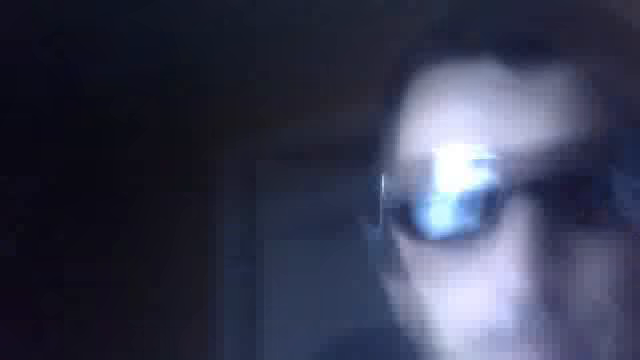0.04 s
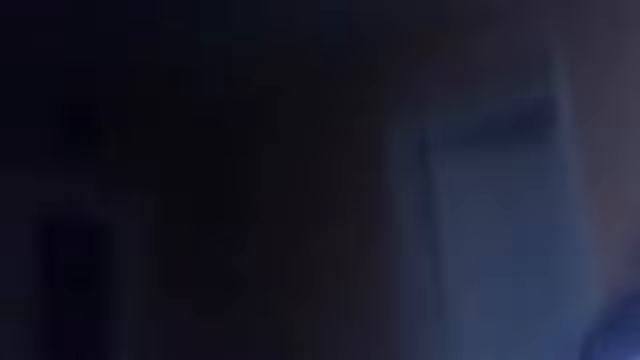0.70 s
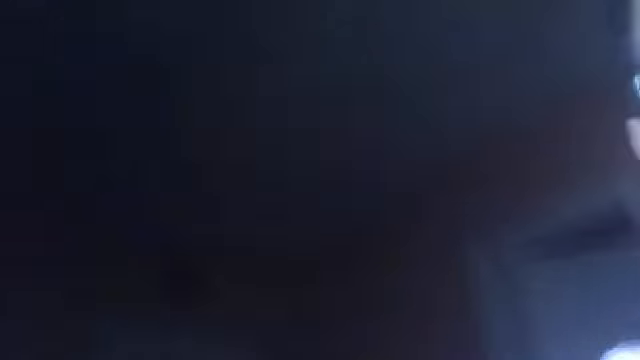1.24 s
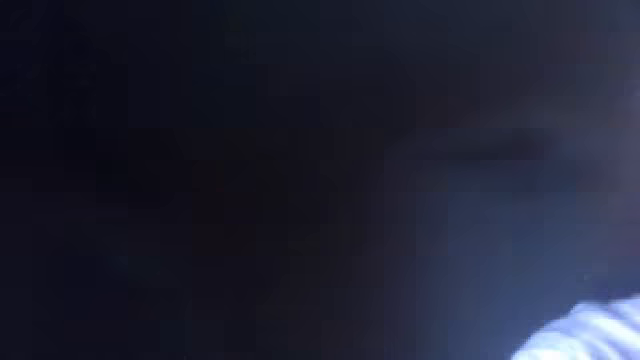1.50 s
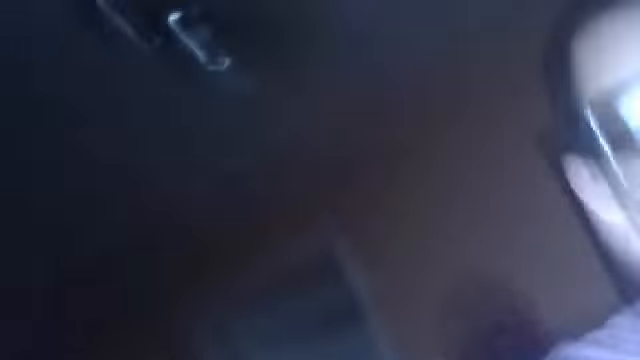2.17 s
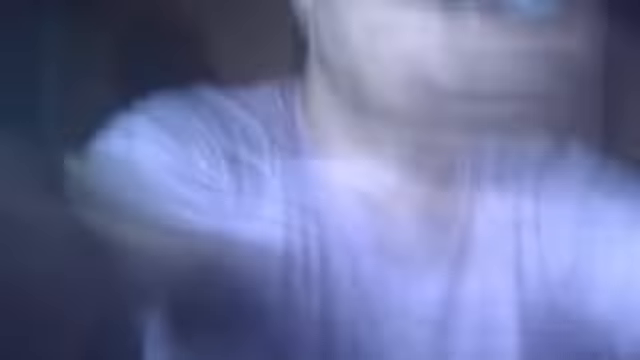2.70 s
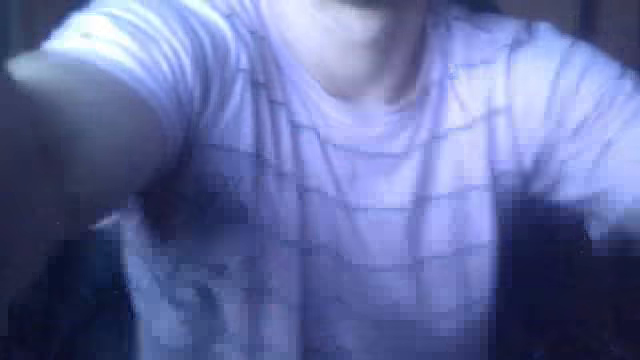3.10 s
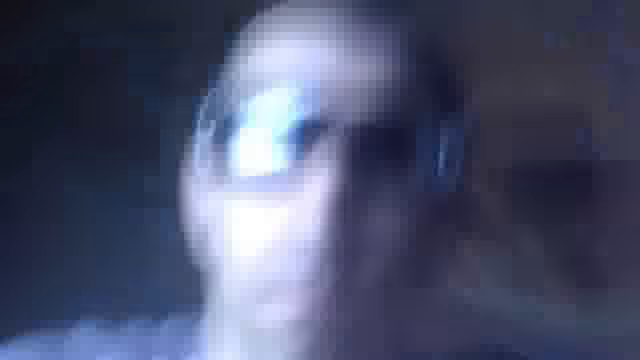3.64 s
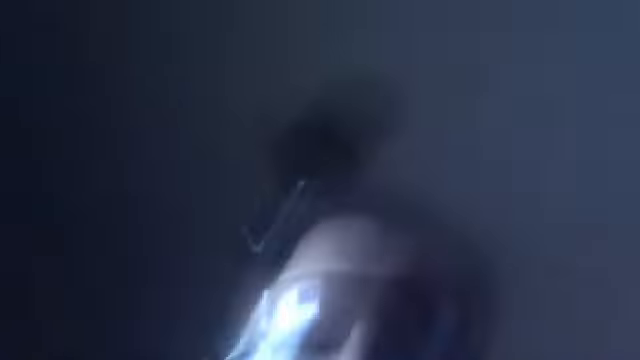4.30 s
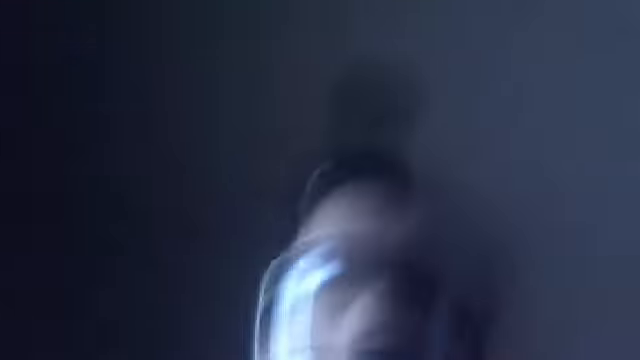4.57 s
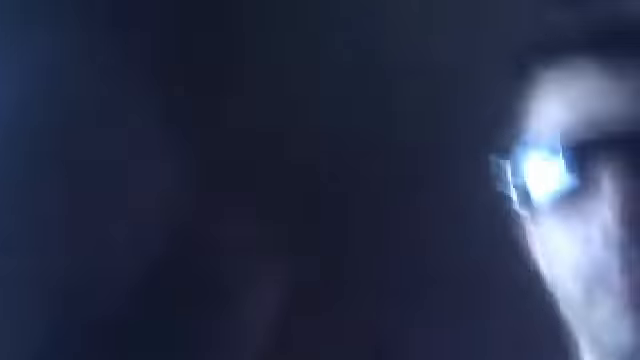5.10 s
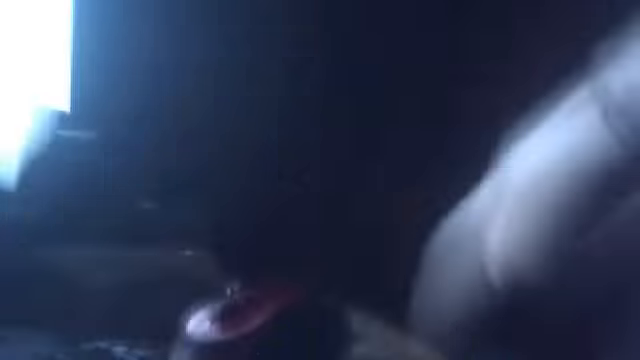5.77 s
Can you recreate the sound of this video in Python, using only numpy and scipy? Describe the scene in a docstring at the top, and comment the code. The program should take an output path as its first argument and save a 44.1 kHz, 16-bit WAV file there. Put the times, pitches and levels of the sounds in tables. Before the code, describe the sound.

A small plastic webcam is handled, with knocks, clicks, rubbing and low rumble on its own microphone over a steady hum.

```python
"""In a quiet room, a small plastic webcam is picked up and turned about, heard through its own microphone.
The hand shakes it with a low rumble, and stick-slip friction makes the skin rub, scuff and squeak.
Finger blows set the camera bouncing on its mount, a damped spring, and ring the thin shell in short ticks.
Mains hum and hiss lie underneath, and the hardest blows overload the input."""
import sys
import numpy as np
from scipy import signal
from scipy.fft import rfft, irfft, next_fast_len
from scipy.io import wavfile
from scipy.ndimage import uniform_filter1d, map_coordinates

SR = 44100
rng = np.random.default_rng(int(sys.argv[2]) if len(sys.argv) > 2 else 0)


def log_audio(samples):
    """Write samples as a 16-bit WAV file to the path given in sys.argv[1]."""
    # one column per channel
    frames = np.atleast_2d(samples).T
    # limit to full scale, then quantise
    limited = np.clip(frames, -1, 1)
    pcm = np.round(limited * 32767).astype(np.int16)
    wavfile.write(sys.argv[1], SR, pcm)


N = 263718


def amp(db):
    """Decibels as an amplitude ratio."""
    return 10 ** (np.asarray(db) / 20)


def unit(x):
    """Normalisation to an rms of 1."""
    return x / np.sqrt(np.mean(x ** 2) + 1e-20)


def wobble(rate):
    """Smooth random modulation: a spline through `rate` knots a second."""
    knots = rng.standard_normal(int(N * rate / SR) + 4)
    return map_coordinates(knots, [np.arange(N) * rate / SR])


def filtered(x, response):
    """Linear filtering: the spectrum of x times a complex frequency response."""
    size = next_fast_len(len(x) + SR // 4)
    return irfft(rfft(x, size) * response(np.fft.rfftfreq(size, 1 / SR)), size)[:len(x)]


def coloured(x, spectrum):
    """Spectral shaping by (Hz, dB) points joined on a logarithmic frequency axis."""
    hz, db = np.transpose(spectrum)
    return filtered(x, lambda f: amp(np.interp(np.log(f + 1), np.log(hz + 1), db)))


def add(track, start_s, sound):
    """Superposition of a sound on the track."""
    part = track[round(start_s * SR):][:len(sound)]
    part += sound[:len(part)]


def friction(spectrum, rate, grain_db, flutter_db, patchy_db):
    """Stick-slip friction: `rate` releases a second over hiss; the colour shifts as the contact moves."""
    releases = (rng.random(N) < rate / SR) * rng.standard_normal(N)
    grainy_hiss = rng.standard_normal(N) + amp(grain_db) * unit(releases)
    frames = signal.stft(grainy_hiss, nperseg=1024)[2]
    patches = uniform_filter1d(rng.standard_normal(frames.shape), size=5, axis=0)
    patches = uniform_filter1d(patches, size=5, axis=1)
    force = signal.istft(frames * amp(patchy_db * unit(patches)), nperseg=1024)[1][:N]
    return unit(coloured(force, spectrum) * amp(flutter_db * wobble(70)))


# The noise floor. Each row: frequency in Hz, relative spectral density in dB.
ROOM_SPECTRUM = [(60, -6), (200, -10), (290, -12.5), (370, -1.5), (550, -10.5), (950, -12.5), (1200, -16),
                 (1650, -16.5), (2100, -19), (2650, -19), (3300, -22), (4700, -24), (6000, -44)]

def room(level_db=-56):
    """Stationary noise: the quiet room and the microphone's own hiss."""
    return amp(level_db) * unit(coloured(rng.standard_normal(N), ROOM_SPECTRUM))


# The mains lines. Each row: frequency in Hz, rms level in dB.
HUM_LINES = [(49.8, -33.5), (199.2, -61)]

def hum():
    """Mains pick-up: steady sinusoids at the supply frequency and its fourth harmonic."""
    t = np.arange(N) / SR
    return sum(np.sqrt(2) * amp(db) * np.sin(2 * np.pi * (hz * t + rng.random())) for hz, db in HUM_LINES)


# Strokes of the hand. Each row: start and length in seconds, then gains in dB of rub, slide and shake.
HAND_STROKES = [(0, 0.58, -52, -52, -38.5), (0.269, 0.29, -48, -81, -41), (0.614, 0.47, -46, -65, -43),
                (1.205, 0.14, -55, -61.5, -54), (1.418, .52, -56.5, -59.5, -44.5),
                (2.724, 0.25, -66, -70, -39.5), (3.449, 0.66, -41.5, -49, -33),
                (3.563, 0.13, -39, -50, -39.5), (3.828, .15, -37.5, -49.5, -24),
                (4.132, 0.19, -46.5, -57, -32.5), (4.341, 0.431, -44.5, -59, -32.5),
                (4.931, 0.096, -46.5, -63, -31), (5.066, 0.54, -46, -57, -31), (5.27, 0.13, -57, -50, -56),
                (5.7, 0.16, -40.5, -66, -26.5)]

def strokes(attack_s=0.024, release_s=0.023, unsteady_db=1.97):
    """Amplitude envelopes: each stroke swells, holds under unsteady pressure and decays exponentially."""
    t, gains = np.arange(N) / SR, np.zeros((3, N))
    for start, length, *levels_db in HAND_STROKES:
        swell = np.clip((t - start) / attack_s, 0, 1)
        decay = np.exp(-np.clip(t - start - length, 0, 1) / release_s)
        gains += np.outer(amp(levels_db), swell * decay)
    return gains * amp(unsteady_db * wobble(21))


# The hand's shake. Each row: frequency in Hz, relative spectral density in dB.
TREMOR_SPECTRUM = [(8, -15.5), (22, 10), (36, 2), (55, 0.5), (80, -0.5), (120, -7.5), (200, -13.5),
                   (300, -19.5), (600, -59), (1500, -99.5)]

def tremor(shake_gain, resting_db=-41.5):
    """Structure-borne rumble: the holding hand shakes the camera, more so while it rubs."""
    shake = friction(TREMOR_SPECTRUM, rate=120, grain_db=-8, flutter_db=0.8, patchy_db=0.8)
    return (amp(resting_db) + shake_gain) * shake


# Dragging skin, and hiss in the cavity behind the microphone port.
# Each row: frequency in Hz, relative spectral density in dB.
SKIN_SPECTRUM = [(88, -25.5), (150, -10.5), (278, -0.5), (373, 0.5), (654, -6), (1130, -18.5), (1480, -22),
                 (1620, -28.5), (2200, -20.5), (2860, -54), (4840, -120)]
PORT_SPECTRUM = [(500, -35), (950, -12.5), (1250, -11), (1500, -6), (1750, -13), (2330, -9.5), (2560, -0.5),
                 (2780, -2.5), (3150, -13), (3900, -15), (4550, -11.5), (5200, -21)]

def rubbing(skin_gain, slide_gain, slide_db=0.5):
    """Sliding friction: skin drags dully over the housing, and cavity resonance colours a dry hiss."""
    skin = friction(SKIN_SPECTRUM, rate=220, grain_db=-2.5, flutter_db=2.0, patchy_db=4.0)
    slide = friction(PORT_SPECTRUM, rate=200, grain_db=-12, flutter_db=1.5, patchy_db=2.5)
    return skin_gain * skin + amp(slide_db) * slide_gain * slide


def friction_burst(scrape, middle_s, half_s, db, centre_hz, half_octaves):
    """Band-limited friction: a Gaussian window in time and another in log frequency."""
    out, t = np.zeros(N), np.arange(N) / SR - middle_s
    span = np.abs(t) < np.pi * half_s
    band = filtered(scrape[span], lambda f: np.exp(-(np.log2((f + 1) / centre_hz) / half_octaves) ** 2))
    out[span] = amp(db) * unit(band) * np.exp(-(t[span] / half_s) ** 2)
    return out


# The scraped shell. Each row: frequency in Hz, relative spectral density in dB.
SCRAPE_SPECTRUM = [(200, -1), (800, -4), (1120, -6), (1510, -1.5), (1760, -10), (2030, -3), (2240, -7),
                   (2580, -2), (2900, -8), (3880, -4.5), (4600, -4), (5400, -11.5)]
# Slips of the grip. Each row: middle and half length in seconds, level in dB, band centre in Hz.
GRIP_SLIPS = [(.11, 0.14, -48.5, 722), (0.532, 0.032, -44, 2200), (0.576, 0.021, -43, 2430),
              (1.809, 0.028, -41, 478), (2.679, 0.044, -43.5, 2550), (2.812, 0.038, -45, 2570),
              (2.915, 0.028, -44, 2210), (3.048, 0.024, -46.5, 2340), (3.102, 0.025, -50.5, 2440),
              (3.221, 0.028, -40, 2060), (3.611, 0.034, -30.5, 389), (3.765, 0.013, -28.5, 390),
              (3.7, 0.017, -45, 420), (3.89, 0.011, -25, 543), (3.962, 0.063, -44.5, 3990),
              (4.066, 0.037, -42, 780), (4.227, 0.063, -49, 3900), (4.28, 0.035, -45.5, 1360),
              (4.626, .011, -41.5, 3870), (5.129, 0.019, -42, 3610), (5.287, 0.017, -38.5, 4020),
              (5.506, 0.028, -48, 1500), (5.768, 0.009, -27, 4430), (5.776, 0.0073, -19.5, 1725),
              (5.794, 0.0095, -28, 3800)]

def slips(scrape, half_octaves_at_2khz=0.87, widening=0.4):
    """Transient friction: each slip scuffs the shell in a band that is broader the higher it lies."""
    return sum(friction_burst(scrape, middle, half, db, hz, half_octaves_at_2khz * (hz / 2000) ** widening)
               for middle, half, db, hz in GRIP_SLIPS)


def soft_contact(hz, corner_hz):
    """Contact compliance: a fourth-order low-pass response."""
    return 1 / (1 + 1j * np.sqrt(2) * hz / corner_hz - (hz / corner_hz) ** 2) ** 2


# Finger blows. Each row: start in seconds, relative force in dB, rise time in milliseconds,
# bounce frequency in Hz, which the grip sets.
BLOWS = [(0.3215, -19, 0.94, 100), (0.3303, -2, 1.35, 132), (0.5073, -12.5, 1.96, 115),
         (0.5545, -12.5, .45, 165), (0.5847, -3, 2.4, 135), (.9626, -28, 0.81, 200),
         (1.0326, -17, 1.9, 107), (1.113, -12.5, 1, 110), (1.2168, -21.5, 0.5, 150), (1.32, -26, 1, 96),
         (1.342, -26.5, 1, 112), (1.4085, -28, 1, 101), (1.6707, -16.5, 2.5, 69.5),
         (1.851, -28.5, 1.7, 230), (2.207, -15.5, 3, 70), (2.224, -2.5, 5.2, 56), (2.254, -15, 4.4, 74),
         (2.282, -10, 6.2, 65), (2.4, -18.5, 1.5, 95), (2.406, -23.5, 2.76, 332), (2.6425, -11.5, 4.6, 91),
         (2.886, -24, 2.9, 110), (3.0259, -15.5, 3.7, 127), (3.053, -19.5, 1, 421), (3.186, -16, 3.1, 86),
         (3.236, -18, 3.1, 91), (3.2948, -27, 0.42, 220), (3.4245, -6.5, 1, 138), (3.7565, -14, 2.2, 158),
         (3.9038, -2, 3, 120), (3.9232, -4.5, 5.2, 75), (3.952, -7.5, 1.3, 55), (4.0127, -17.5, 1.67, 190),
         (4.1155, -18, 1.7, 201), (4.1525, -8, 1.72, 154), (4.325, -17, 2.4, 96), (4.3946, -7.5, 3.5, 54.7),
         (4.4889, 3.5, 1.68, 78.4), (4.4978, -3.5, 1.32, 141), (4.611, -21.5, 0.48, 196),
         (4.7266, -14.5, 1.97, 213), (4.823, -10, 0.99, 149), (4.8357, 4.5, 1.56, 195),
         (4.8383, 1.5, 1.35, 315), (4.9687, -10, 0.53, 162), (5.1469, -12, 0.34, 90),
         (5.171, -13.5, 0.34, 180), (5.1888, -24, 1.7, 230), (5.2759, -2, 0.71, 100),
         (5.2885, -7, 1.75, 70), (5.3401, -19.5, 0.34, 200), (5.488, 1, 6.1, 55), (5.511, -4, 3.5, 60),
         (5.7235, -10, 2.65, 85), (5.775, 7, 2.2, 88), (5.779, 4, 0.61, 285), (5.952, -23, 2.8, 129)]
# Housing resonances. Each row: frequency in Hz, bandwidth in Hz, gain in dB.
HOUSING_MODES = [(236, 11, -34.5), (363, 63, -17), (505, 140, -14.5), (605, 260, -8.5), (990, 100, -32)]

def knocks(bounce_t60=0.036, rattle_db=-17, rattle_t60=0.14, lurch_db=-16.5, lurch_hz=41, lurch_t60=0.15):
    """Forced vibration: the microphone feels a mass accelerate on a damped spring as the housing rings."""
    out, t = np.zeros(N), np.arange(SR // 6) / SR
    damping_hz = np.log(1000) / (np.pi * bounce_t60)
    # The arm gives way under a blow, and further under a slow one.
    phase = 2 * np.pi * lurch_hz * t
    lurch = np.sin(phase) * amp(lurch_db - 60 * t / lurch_t60) * (1 - np.exp(-phase))
    for start, db, rise_ms, bounce_hz in BLOWS:
        rises = 1000 * t / rise_ms
        push = rises ** 2 * np.exp(2 - 2 * rises)  # a softer contact gives a longer, duller push
        jolt = filtered(push, lambda f: -f * f / (bounce_hz ** 2 - f * f + 1j * f * damping_hz))
        # Loose joints scatter a little of the jolt into a short tail.
        joints = rng.standard_normal(len(t)) * amp(-60 * t / rattle_t60)
        rattle = signal.fftconvolve(jolt, joints / np.linalg.norm(joints))[:len(t)]
        add(out, start, amp(db) * (jolt + amp(rattle_db) * rattle - rise_ms ** 0.6 * lurch))
    housing = lambda f: 1 + sum(amp(db) * 1j * f * width / (hz * hz - f * f + 1j * f * width)
                                for hz, width, db in HOUSING_MODES)
    return filtered(out, lambda f: housing(f) * np.abs(soft_contact(f, corner_hz=2170)))


def blow_ticks(db_at_1ms=-25.5, loss_db=6.5, corner_hz=2590):
    """Impact excitation: each blow ticks the shell, weaker by loss_db per doubling of its rise time."""
    return [(start, db + db_at_1ms - loss_db * np.log2(rise_ms), corner_hz)
            for start, db, rise_ms, _ in BLOWS]


# The casing clicks under the grip. Each row: time in seconds, peak level in dB, low-pass corner in Hz.
CASING_CLICKS = [(2.399, -37.5, 2670), (2.6514, -7, 3400), (2.665, -15, 3800), (2.758, -32, 1860),
                 (2.8867, -30, 3960), (2.909, -24.5, 3210), (3.0262, -24.5, 3140), (3.055, -22, 2550),
                 (3.1822, -26, 4100), (3.4222, -5, 3900), (3.9082, -24, 2960), (3.932, -20, 3000),
                 (4.491, -18.5, 2240), (4.6342, -15.5, 4800), (4.8405, -22.5, 1640), (5.127, -15.5, 3500),
                 (5.2769, -16.5, 3570), (5.34, -24.5, 3100), (5.4957, -24.5, 2720), (5.7686, -8, 5520),
                 (5.7764, 2, 3300), (5.783, -12, 2370)]
# Shell resonances. Each row: frequency in Hz, relative level in dB, time to fall 60 dB in seconds.
SHELL_MODES = [(1680, -23, 0.019), (2113, -13.5, 0.024), (2578, -0.5, 0.013), (2820, -1, 0.0058),
               (3020, -11.5, 0.0065), (3920, -21, .012), (4730, -17.5, 0.03)]

def ticks(crack_db=-4, crack_t60=0.011, rattle_db=-20, rattle_t60=0.094,
          attack_s=0.00031, lead_in_db=-19, lead_in_s=0.0068):
    """Modal ringing: each contact excites the thin shell a little differently, with a crack and rattle."""
    out, lead = np.zeros(N), SR // 50
    t = np.arange(-lead, SR // 10) / SR
    after, before = np.maximum(t, 0), np.maximum(-t, 0)
    for contact_s, db, corner_hz in list(CASING_CLICKS) + blow_ticks():
        ring = sum(amp(mode_db + rng.normal(0, 0.62) - 60 * after / t60)
                   * np.sin(2 * np.pi * hz * rng.normal(1, 0.015) * after)
                   for hz, mode_db, t60 in SHELL_MODES)
        grit = unit(coloured(rng.standard_normal(len(t)), SCRAPE_SPECTRUM))
        crack = amp(crack_db - 60 * after / crack_t60) * grit
        rattle = amp(rattle_db - 60 * after / rattle_t60) * grit
        # A faint noise swells just before each tick and softens its attack.
        lead_in = amp(lead_in_db) * np.exp(-before / lead_in_s) * (t < 0) * grit
        onset = 1 - np.exp(-after / attack_s)
        tick = filtered(lead_in + onset * (ring + crack + rattle), lambda f: soft_contact(f, corner_hz))
        add(out, contact_s - lead / SR, amp(db) * tick / np.abs(tick).max())
    return out


# Fingertip squeaks. Each row: middle and half length in seconds, level in dB, pitch in Hz.
FINGER_SQUEAKS = [(0.587, 0.0082, -44, 2010), (2.817, .03, -59, 2120), (3.773, 0.042, -41, 2500),
                  (4.662, 0.11, -53.5, 2660), (5.536, 0.022, -55.5, 1790)]

def squeaks(scrape, half_octaves=0.15):
    """Narrow-band friction: a fingertip sticks on the shell and squeaks close to one pitch."""
    return sum(friction_burst(scrape, *squeak, half_octaves) for squeak in FINGER_SQUEAKS)


def scene():
    """Superposition: all the sources sum at the one microphone in the camera's body."""
    skin_gain, slide_gain, shake_gain = strokes()
    handling = knocks() + ticks() + rubbing(skin_gain, slide_gain)
    scrape = friction(SCRAPE_SPECTRUM, rate=270, grain_db=-2.5, flutter_db=4.0, patchy_db=1)
    return (handling + slips(scrape) + squeaks(scrape) + tremor(shake_gain) + hum() + room())[None]


# Frequency responses of the microphone and the input stage. Each row: frequency in Hz, gain in dB.
MICROPHONE_RESPONSE = [(4600, -1), (4850, -4.5), (5300, -1.5), (5600, -11), (6200, -40), (7000, -78)]
INPUT_RESPONSE = [(4400, -1.5), (6000, -9.5), (15000, -3.5)]

def record(dry, clip_level=0.71, hardness=24, hiss_db=-99, top_hz=15800):
    """Saturation: a narrow-band microphone feeds a dull, faintly hissing input that clips nearly flat."""
    picked_up = coloured(dry[0], MICROPHONE_RESPONSE)
    clipped = picked_up / (1 + np.abs(picked_up / clip_level) ** hardness) ** (1 / hardness)
    dulled = coloured(clipped + amp(hiss_db) * rng.standard_normal(N), INPUT_RESPONSE)
    return filtered(dulled, lambda hz: hz < top_hz)[None]


dry = scene()
out = record(dry)
log_audio(out)
```